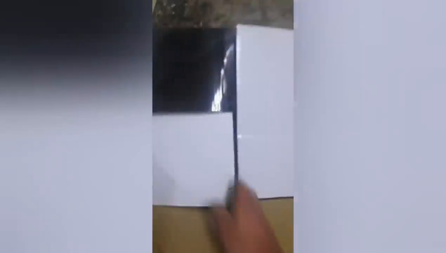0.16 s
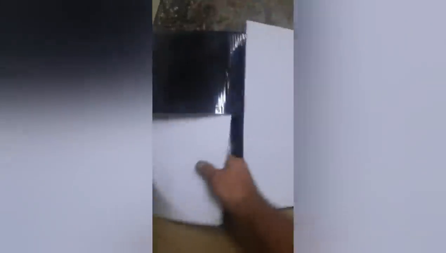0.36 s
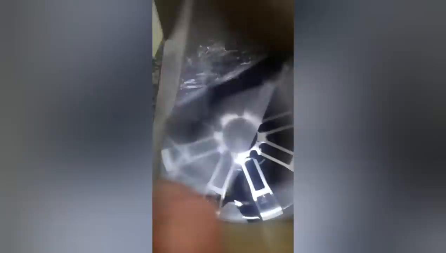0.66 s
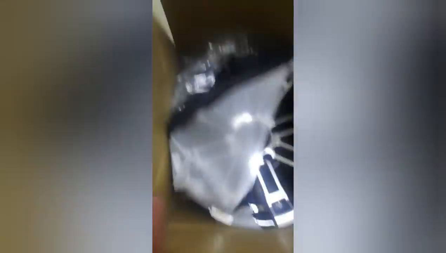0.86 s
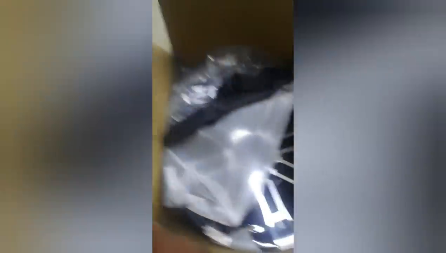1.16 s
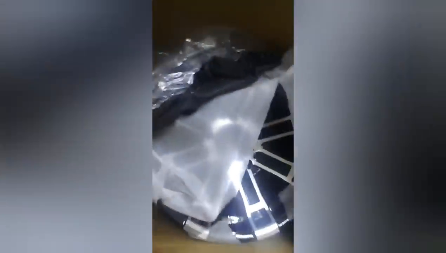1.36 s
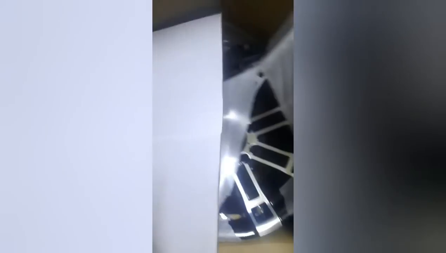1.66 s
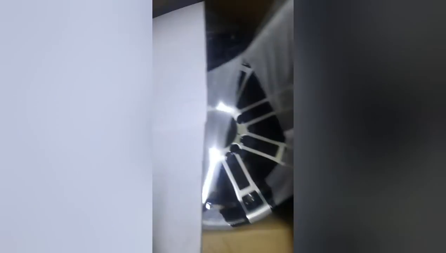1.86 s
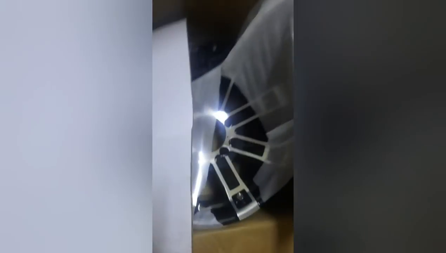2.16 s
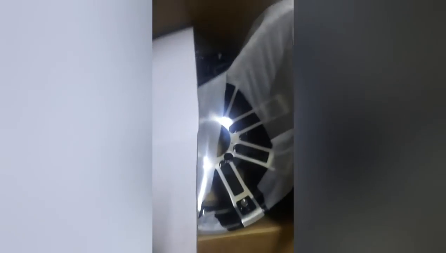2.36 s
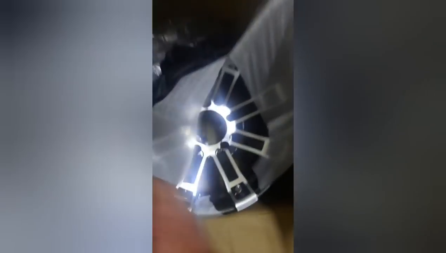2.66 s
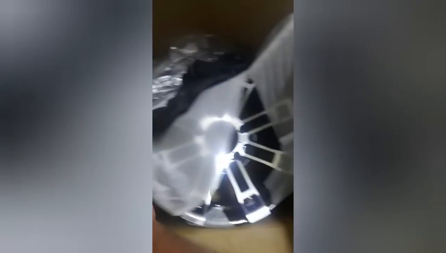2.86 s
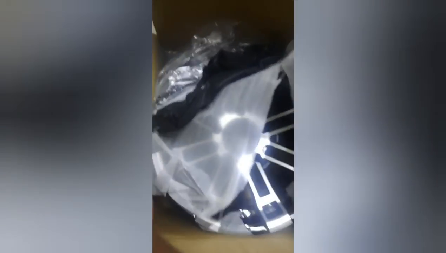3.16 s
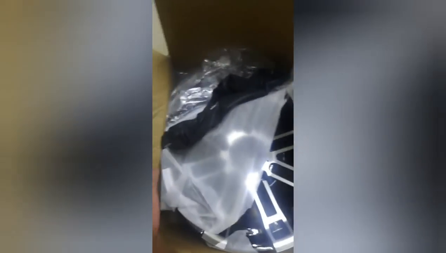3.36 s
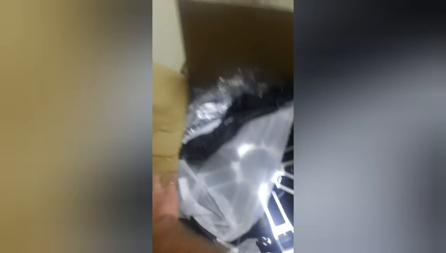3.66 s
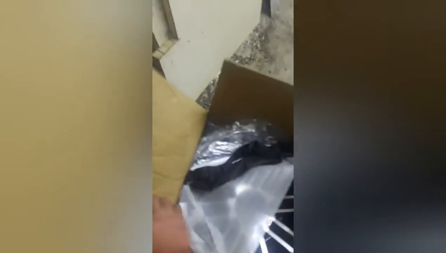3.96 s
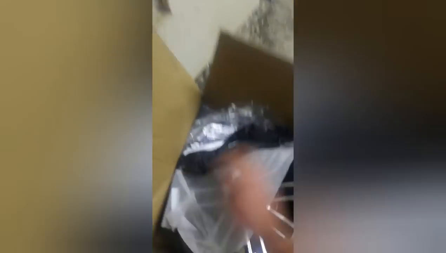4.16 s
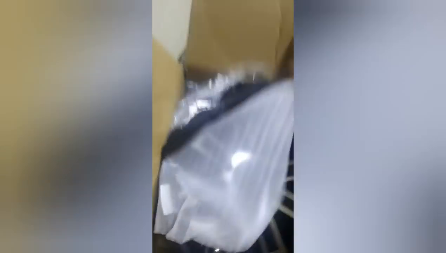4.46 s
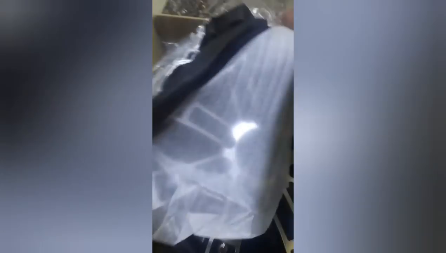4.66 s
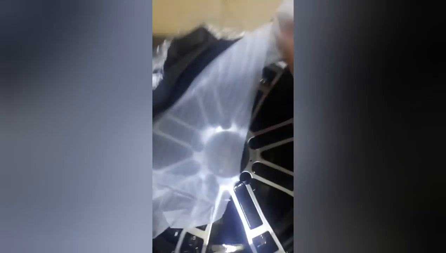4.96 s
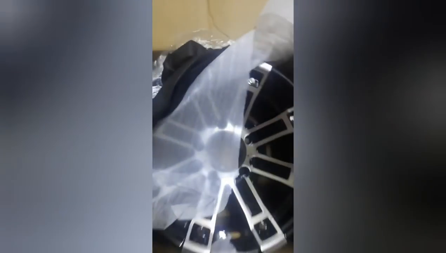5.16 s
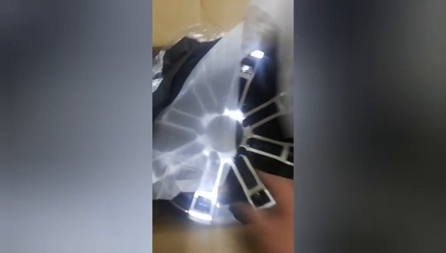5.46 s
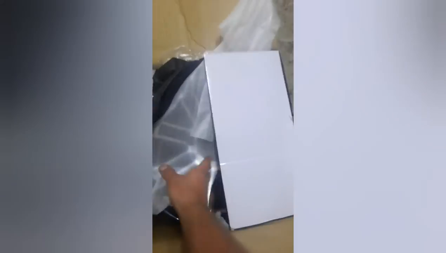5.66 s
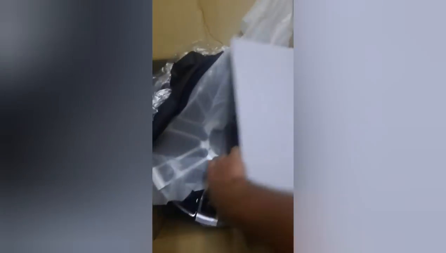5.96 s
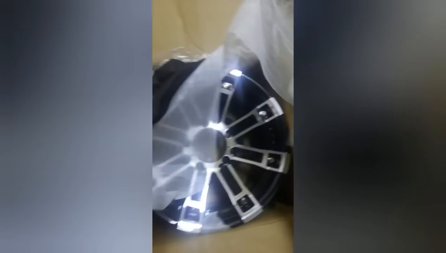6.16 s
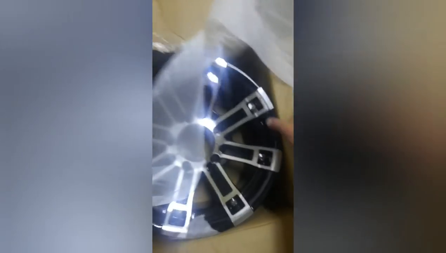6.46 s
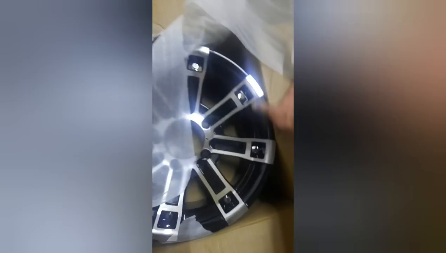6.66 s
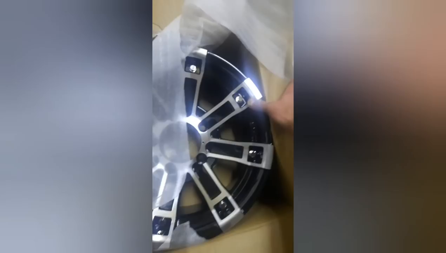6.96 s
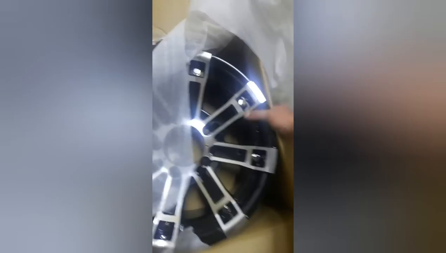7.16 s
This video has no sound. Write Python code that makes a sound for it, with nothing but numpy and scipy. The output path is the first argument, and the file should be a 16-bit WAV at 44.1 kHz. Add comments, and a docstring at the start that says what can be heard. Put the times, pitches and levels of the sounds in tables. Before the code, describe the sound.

Stiff card rubs over crinkly wrap and the walls of a hollow box, in uneven hand strokes. Flaps knock dully, creases crack, and broad panels thud softly. It is busiest in the first two seconds, quiet in the middle, busy again with a softer, lower hiss of foam, then sparse. Heard close by a phone with dull treble, in a lightly echoing garage.

```python
"""Hands open a cardboard box in a garage and pull card sheets and plastic wrap off the wheel inside.
From the start card hisses over wrap, scrapes the box and bends its walls: slips through resonances.
Flaps knock, panels flop and creases snap as decaying tones and noise bursts; a stiff edge ticks at 3.3 s.
From 4.6 s the slide runs on foam, with a lower hiss, and grows sparser after 5.8 s.
Short room echoes follow the handling; a faint steady noise lies under it all, heard by a phone."""
import sys
import numpy as np
from scipy import signal
from scipy.fft import rfft, irfft
from scipy.io import wavfile
from scipy.ndimage import uniform_filter1d

SR = 44100
rng = np.random.default_rng(int(sys.argv[2]) if len(sys.argv) > 2 else 0)


def unload_wav(signal):
    """Save mono or channel-first audio to the path in sys.argv[1] as 16-bit WAV at rate SR, clipped to [-1, 1]."""
    wavfile.write(
        sys.argv[1],
        SR,
        np.round(np.clip(np.atleast_2d(signal).T, -1, 1) * 32767).astype(np.int16),
    )


N = 321533
T = np.arange(N) / SR

CATCH_S, SWELL_DB, FADE_DB = 0.0025, 13, 25


def stroke_shape(swell_s, hold_s, fade_s):
    """Gain of one movement: it catches, swells by SWELL_DB, holds, then loses FADE_DB per fade time."""
    t = T[:SR]
    swelling = np.maximum(1 - t / max(swell_s, .001), 0)
    fading = np.maximum(t - swell_s - hold_s, 0) / max(fade_s, .01)
    catch = 1 - np.exp(-t / CATCH_S)
    return catch * undb(-SWELL_DB * swelling - FADE_DB * fading)


# Hand pushes or pulls card over wrap and box. Each row: start in seconds, swell in seconds,
# hold in seconds, fade in seconds, wrap hiss in dB, card scrape in dB, edge over scrape in dB,
# wall bending in dB. Levels are relative within a layer.
HAND_STROKES = [(0.0, 0.001, 0.18, .45, -37.5, -41.5, 5.5, -45.5),
                (0.203, 0.074, 0.022, 0.12, -34.5, -47, 1, -34),
                (0.36, 0.034, 0.04, .15, -40, -52.5, 6, -49), (0.478, 0.11, 0.0061, .05, -37, -45, 7, -52),
                (0.589, .005, 0.012, 0.07, -26, -31, 10, -23),
                (0.605, 0.012, 0.0075, .17, -32, -30, 2, -18.5),
                (0.782, 0.022, 0.067, .12, -44.5, -54, 4, -33.5),
                (0.92, 0.011, 0.013, 0.31, -48.5, -55.5, 6, -47),
                (1.074, 0.015, 0.031, .28, -35.5, -40.5, -0.5, -35.5),
                (1.161, 0.038, 0.022, .3, -37, -41, 4.5, -51),
                (1.295, .02, 0.11, .2, -44.5, -40.5, -2, -48),
                (1.397, .11, .012, .12, -29.5, -39.5, 2.5, -33.5),
                (1.567, 0.016, 0.0092, .15, -39, -41.5, 1, -29.5),
                (1.622, 0.034, 0.013, .15, -35, -41.5, 9, -37),
                (1.728, .006, 0.027, 0.16, -36.5, -43.5, 9.5, -32),
                (1.844, 0.016, 0.012, .18, -51, -51, -9, -30.5),
                (1.958, 0.038, 0.017, 0.29, -43.5, -58, 6.5, -52),
                (2.054, 0.15, 0.25, 0.13, -41, -67, 14.5, -59),
                (2.267, 0.059, 0.21, 0.035, -51, -52.5, -3, -60),
                (2.638, 0.044, 0.053, 0.075, -49, -52.5, -6, -59),
                (2.738, 0.012, 0.006, .07, -54, -46.5, -7, -53),
                (2.881, 0.022, 0.013, 0.12, -58.5, -46, -30, -51),
                (2.971, 0.018, 0.012, .1, -53.5, -60, 1.5, -55),
                (3.069, 0.029, 0.042, 0.17, -46, -45.5, -3.5, -57),
                (3.26, 0.011, 0.048, .15, -44, -53.5, 6, -44.5),
                (3.36, 0.056, 0.066, .25, -43, -53, 5, -63),
                (3.556, 0.041, .005, .08, -44.5, -45.5, -4, -57),
                (3.617, 0.0072, 0.012, 0.44, -48, -42, -5, -36),
                (3.75, 0.0058, 0.039, .1, -46.5, -52, 0, -51),
                (3.797, 0.0079, 0.078, .18, -36.5, -45.5, 3.5, -41.5),
                (3.985, 0.034, 0.033, .1, -47.5, -50, 6.5, -52),
                (4.058, 0.0039, 0.017, .1, -39, -39, -1, -50),
                (4.107, 0.0063, 0.036, .2, -36, -43, 8.5, -44),
                (4.287, 0.15, 0.076, 0.12, -31, -30, 1.5, -35),
                (4.731, 0.029, 0.067, 0.1, -41.5, -31.5, -0.5, -58),
                (4.815, 0.042, 0.014, .15, -31, -26.5, 0, -28.5),
                (5.197, 0.024, 0.18, .15, -38.5, -48, 6.5, -58),
                (5.299, 0.089, 0.034, 0.19, -28.5, -39.5, 9.5, -34),
                (5.552, 0.018, 0.13, .1, -45.5, -59, 14.5, -48),
                (5.756, 0.097, 0.047, .2, -42.5, -53, 10.5, -63),
                (5.892, 0.11, 0.28, .24, -39.5, -56, 2, -61),
                (6.23, 0.011, 0.038, 0.17, -60, -50.5, -9, -45),
                (6.576, 0.086, 0.015, .1, -55, -74, 2, -86),
                (6.736, 0.086, 0.072, 0.11, -47, -55.5, 12, -52.5),
                (7.06, 0.016, 0.049, .1, -50, -56.5, 5.5, -48.5),
                (7.096, 0.057, 0.037, 0.13, -42, -49, 5.5, -42.5)]
HUM_FROM_SCRAPE_DB, HUM_FROM_WALLS_DB = -2.5, -5


def stroke_gains():
    """Gain of each rubbing layer: strokes add in power; scraping and bending together drive the hollow."""
    power = np.zeros((4, N))
    for start_s, swell_s, hold_s, fade_s, hiss_db, scrape_db, edge_db, bend_db in HAND_STROKES:
        shape = stroke_shape(swell_s, hold_s, fade_s)
        levels_db = (hiss_db, scrape_db, scrape_db + edge_db, bend_db)
        for layer, db in zip(power, levels_db):
            add(layer, start_s, (undb(db) * shape) ** 2)
    hiss, scrape, edge, flex = np.sqrt(power)
    hum = np.hypot(undb(HUM_FROM_SCRAPE_DB) * scrape, undb(HUM_FROM_WALLS_DB) * flex)
    return hiss, scrape, edge, hum, flex


# Spectra of plastic wrap, foam cover, card, crumpling or creasing, and bending box walls.
# Each row: frequency in Hz, level in dB.
WRAP_SPECTRUM = [(2120, -21), (3600, -11.5), (5370, -1.5), (7300, 0), (7980, -2.5), (9450, -17),
                 (12300, -47.5), (20800, -120)]
FOAM_SPECTRUM = [(1710, -22), (2900, -10), (3230, -8), (4520, -3), (4950, -1.5), (5350, -0.5), (7270, 1.5),
                 (8230, -4), (9450, -14.5), (12300, -65), (20800, -120)]
CARD_SPECTRUM = [(240, -14.5), (400, -3), (443, -5.5), (657, -4), (712, -2), (773, -4), (846, 1),
                 (975, -11), (1080, -7), (1220, -9.5), (1720, -7), (2260, -6), (2500, -9.5), (3160, -16),
                 (4500, -17), (5850, -34), (9900, -120)]
CREASE_SPECTRUM = [(880, -31.5), (1500, 3), (2550, 4), (3120, -5.5), (3340, -4.5), (5680, -3),
                   (6630, -11.5), (7560, 2.5), (9450, -23.5), (12300, -54.5), (20800, -120)]
WALL_SPECTRUM = [(22, -27.5), (45, 0.5), (80, 1.5), (150, 4), (220, -2.5), (330, -16.5), (600, -44)]
# Resonances of the card panels, then air modes of the open box.
# Each row: frequency in Hz, level in dB, t60 in seconds.
PANEL_MODES = [(479, -9, .09), (524, -9, .09), (646, -10, .08), (758, -9, .08), (962, -1, .08),
               (1157, -12, .05), (1437, -8, .06), (1685, -7, .06), (2007, -8, .06)]
HOLLOW_MODES = [(295.4, -7, 0.14), (323.2, 3.5, 0.059), (376, 0.5, 0.06)]
FOAM_FROM_S = 4.6


def rubbing(edge_hz=1250, firm_db=-32, crumple_db=-3, crumple_growth=0.69):
    """Card catches and slips over wrap and box; the same uneven grip shakes every layer."""
    hiss, scrape, edge, hum, flex = stroke_gains()
    grip_db = 1.0 * walk(45) + 0.66 * walk(170)
    t = T[:SR // 5]

    # dense slips hiss, sparse ones crinkle
    film = slips(rate=17000, spread_db=1.5) + undb(-12.5) * slips(rate=290, spread_db=5)
    on_wrap = unit(colour(film, WRAP_SPECTRUM))
    on_foam = unit(colour(film, FOAM_SPECTRUM))
    slide = np.where(T < FOAM_FROM_S, on_wrap, on_foam)
    # coarser, lower crumpling grows with the hiss gain
    crumple = unit(colour(slips(rate=3500, spread_db=1), CREASE_SPECTRUM))
    crumple *= (hiss / undb(firm_db)) ** crumple_growth
    wrap = (slide + undb(crumple_db) * crumple) * hiss * undb(-1 + 1.41 * grip_db)

    # coarse fibres catch and ring the board; a sharp edge brings out its upper range
    fibres = slips(rate=2600, spread_db=1.0)
    ringing = unit(convolve(fibres, ring(PANEL_MODES, t)))
    board = unit(colour(fibres, CARD_SPECTRUM)) + undb(-2) * ringing
    low_pass = signal.butter(4, edge_hz, "low", fs=SR, output="sos")
    high_pass = signal.butter(4, edge_hz, "high", fs=SR, output="sos")
    dull = unit(signal.sosfilt(low_pass, board))
    sharp = unit(signal.sosfilt(high_pass, board))
    card = dull * scrape * undb(-2.8 + 1.17 * grip_db)
    card += sharp * edge * undb(-3.4 + 1.3 * grip_db)

    # the hollow hums and the broad walls rumble
    hollow = unit(convolve(slips(rate=900, spread_db=-1.0), ring(HOLLOW_MODES, t)))
    hollow *= hum * undb(0.7 + grip_db)
    walls = unit(colour(slips(rate=300, spread_db=-2.0), WALL_SPECTRUM))
    walls *= flex * undb(-4.5 + grip_db)
    return wrap + card + hollow + walls


def bending(x, depth_db=2.5, size=1024, count=5):
    """As a sheet bends its resonances come and go: narrow bands swell and sink on their own."""
    spectra = signal.stft(x, nperseg=size)[2]
    chance = rng.standard_normal(spectra.shape)
    across_bands = uniform_filter1d(chance, count, axis=0)
    drift = unit(uniform_filter1d(across_bands, count, axis=1))
    gain = unit(undb(depth_db * drift))
    return signal.istft(spectra * gain, nperseg=size)[1][:N]


def board_ring(t, spot_db=4, detune=0.02):
    """Card struck at a random spot: each panel mode varies in strength and tuning."""
    chance = rng.standard_normal((len(PANEL_MODES), 2))
    modes = []
    for (hz, db, t60), (a, b) in zip(PANEL_MODES, chance):
        modes.append((hz * (1 + detune * a), db + spot_db * b, t60))
    return ring(modes, t)


# A flap knocks on the box. Each row: start in seconds, relative level in dB, pitch of the hollow in Hz,
# hardness in dB, length of the push in seconds.
FLAP_KNOCKS = [(0.251, -32, 290, 0, 0.00072), (0.602, -16, 270, -19, 0.00053),
               (0.623, -22, 290, -0.5, 0.00065), (0.678, -21.5, 247, 5, 0.0068),
               (0.825, -5, 340, -9.5, 0.0012), (1.861, -16, 288, -9.5, 0.0022),
               (2.577, -38.5, 300, -4, 0.00059), (2.68, -49, 328, -7, 0.0063),
               (2.759, -30.5, 307, -11, 0.0075), (2.904, -31, 307, -25, 0.0075),
               (2.965, -38, 320, 0.5, 0.00068), (3.097, -26.5, 327, -6.5, 0.00094),
               (3.613, -6.5, 291, -11, 0.0015), (4.075, -14.5, 304.4, 6, 0.00097),
               (4.385, -19.5, 290, 1, 0.00085), (4.744, -25.5, 317, -15, 0.046),
               (6.233, -27, 323, -3, 0.0011)]


def knocks(hollow_db=-1.0, board_db=-2.0, crunch_db=-5, boom_s=0.0097, damp_s=0.011):
    """Each knock booms in the hollow; a slow push swells softly, a hard one rings the board more."""
    out, t = np.zeros(N), T[:SR // 4]
    crunch_spectrum = [(150, -14.0), (400, -3), (1000, 3), (2200, -12.0), (5000, -26.5)]  # Hz, dB
    for s, db, hz, hard_db, push_s in FLAP_KNOCKS:
        swell = 1 - np.exp(-(t / max(push_s, .0003)) ** 2)
        boom = swell * np.exp(-t / boom_s) * np.sin(2 * np.pi * hz * t)
        # the flutes crunch under the blow; the flap stays in contact and damps the board
        crunch = unit(colour(slips(rate=8100, spread_db=5.0, size=len(t)), crunch_spectrum))
        struck = peak(board_ring(t)) + undb(crunch_db) * crunch
        clack = struck * np.exp(-t / damp_s) * swell
        knock = undb(hollow_db) * peak(boom) + undb(board_db + hard_db) * peak(clack)
        add(out, s, undb(db) * knock)
    return out


# A crease snaps or an edge slips off. Each row: start in seconds, relative level in dB,
# board-to-crack balance in dB, decay constant in seconds.
CREASE_SNAPS = [(0.593, -5, -9, 0.0071), (0.617, -5.5, 9, 0.0068), (0.657, -14.5, 10, 0.0051),
                (1.084, -18, -2.5, 0.0048), (1.507, -13.5, -10, 0.02), (1.662, -20.5, 13, 0.011),
                (1.74, -16.5, -5, 0.013), (1.764, -18, -20, 0.012), (2.34, -24, -16, 0.0039),
                (3.753, -28.5, -5, 0.013), (3.809, -5.5, -9, 0.0047), (3.877, -24, -14, 0.02),
                (4.119, -11, 18, 0.0048), (4.293, -26, 12, 0.0069), (4.321, -26, 2, 0.0058),
                (4.367, -17, 13, 0.0071), (4.448, -6.5, 17, 0.013), (4.471, -8, 11, 0.012),
                (4.505, -7.5, -3, 0.011), (4.76, -15, 14.5, 0.012), (4.86, -15.5, 2, 0.011),
                (4.881, -15.5, 5, 0.0051), (5.398, -8, -5, 0.0068), (5.414, -7.5, -21, 0.0088),
                (5.455, -10.5, -7.5, 0.0056), (5.517, -19, -12, 0.0053), (5.576, -38, 17, 0.0056),
                (5.762, -26.5, -10, 0.0073), (7.227, -27, -14, 0.0079)]


def snaps(crease_db=-9, board_db=-7.0, rise_s=0.00022):
    """A crease gives way as a short avalanche of fibre breaks, part of it coloured by the board."""
    out, t = np.zeros(N), T[:SR // 6]
    for s, db, body_db, decay_s in CREASE_SNAPS:
        breaks = slips(rate=8000, spread_db=4.0, size=len(t))
        avalanche = peak((1 - np.exp(-t / rise_s)) * np.exp(-t / max(decay_s, .001)))
        crack = undb(crease_db) * unit(colour(breaks, CREASE_SPECTRUM))
        body = undb(board_db + body_db) * unit(colour(breaks, CARD_SPECTRUM))
        add(out, s, undb(db) * avalanche * (crack + body) / np.hypot(1, undb(body_db)))
    return out


# A wall or sheet is bumped and flops. Each row: start in seconds, relative level in dB, pitch in Hz.
PANEL_BUMPS = [(0.268, -24.5, 84), (0.614, -13, 168.4), (0.633, -15, 81.6), (0.655, -19, 200),
               (1.081, -27.5, 98.5), (1.209, -26.5, 90), (1.52, -25, 176), (1.584, -17.5, 134.5),
               (1.655, -33, 80), (1.741, -34, 85), (1.816, -19.5, 166), (1.882, -28, 97.7),
               (2.997, -35, 88.4), (3.122, -35, 65.4), (3.267, -35, 180), (3.615, -21, 85),
               (3.636, -18, 113), (4.077, -29.5, 191), (4.451, -22, 156), (5.208, -19.5, 156.3),
               (5.222, -21.5, 63.7), (5.466, -28, 72), (5.668, -30.5, 100), (6.227, -33, 160),
               (6.318, -35.5, 93.8), (7.07, -30, 109), (7.115, -34, 104)]


def bumps(level_db=-2, decay_s=0.01, push_s=0.0074, overtone=1.68, overtone_db=-6):
    """A broad panel swings for a few cycles after a soft push."""
    out, t = np.zeros(N), T[:SR // 4]
    for s, db, hz in PANEL_BUMPS:
        swing = np.sin(2 * np.pi * hz * t)
        swing += undb(overtone_db) * np.sin(2 * np.pi * hz * overtone * t)
        envelope = (1 - np.exp(-t / push_s)) * np.exp(-t / decay_s)
        add(out, s, undb(db + level_db) * peak(swing * envelope))
    return out


# A fingernail ticks on stiff plastic. Each row: start in seconds, relative level in dB, pitch in Hz.
NAIL_TICKS = [(3.264, -26, 2210)]


def ticks(level_db=-1, decay_s=0.0013, partner=0.76):
    """A small stiff piece rings briefly with a pair of modes."""
    out, t = np.zeros(N), T[:SR // 20]
    for s, db, hz in NAIL_TICKS:
        pair = np.sin(2 * np.pi * hz * t) - 0.19 * np.sin(2 * np.pi * hz * partner * t)
        add(out, s, undb(db + level_db) * peak(pair * np.exp(-t / decay_s)))
    return out


# First echoes from floor and nearby walls. Each row: delay in seconds, level in dB before colouring.
EARLY_ECHOES = [(.0065, -31.5), (0.023, -18), (0.05, -22), (.053, -27)]


def garage(x, t60=0.44, tail_db=-12, build_s=0.0061):
    """A few early echoes and a short diffuse tail, both weaker in the treble."""
    t = T[:SR]
    decay = np.exp(-np.log(1000) * t / t60)
    tail = rng.standard_normal(SR) * decay * (1 - np.exp(-t / build_s))
    response = undb(tail_db) * tail / np.sqrt(np.sum(tail ** 2))
    for s, db in EARLY_ECHOES:
        response[int(s * SR)] += undb(db)
    return x + colour(convolve(x, response), [(60, 0.5), (300, 1), (1500, -2), (8000, -11.0)])


# Spectrum of the quiet garage. Each row: frequency in Hz, level in dB.
GARAGE_SPECTRUM = [(25, -5.5), (100, -6), (220, -14.5), (315, 5), (420, 1), (1500, -5.5), (3200, -17),
                   (6500, -10.5), (9500, -25)]
AMBIENCE_DB = -62  # rms before the microphone


def ambience():
    """Steady random noise with the spectrum of the quiet garage."""
    return undb(AMBIENCE_DB) * unit(colour(rng.standard_normal(N), GARAGE_SPECTRUM))


def slips(rate, spread_db, size=N):
    """Tiny random catches and releases, rate per second, with random sign and strength."""
    chance, strength = rng.random(size), rng.standard_normal(size)
    sign = rng.choice([-1, 1], size)
    gain = undb(spread_db * np.clip(strength, -3, 2.5))
    return unit((chance < rate / SR) * sign * gain)


def walk(rate):
    """Smooth random wandering of rms 1, rate in steps per second."""
    steps = rng.standard_normal(4096)
    return unit(np.interp(T * rate, np.arange(len(steps)), steps))


def ring(modes, t):
    """Free ringing of a set of (Hz, dB, t60) modes."""
    return sum(undb(db - 60 * t / t60) * np.sin(2 * np.pi * hz * t) for hz, db, t60 in modes)


def colour(x, points, size=4096):
    """Causal minimum-phase filter with the given (Hz, dB) spectrum."""
    hz, db = np.transpose(points)
    grid = np.maximum(np.arange(size // 2 + 1) * SR / size, 1)
    gain = undb(np.interp(np.log(grid), np.log(hz), db))
    cepstrum = irfft(np.log(gain))
    # fold the cepstrum onto positive time
    cepstrum[1:size // 2] *= 2
    cepstrum[size // 2 + 1:] = 0
    return convolve(x, irfft(np.exp(rfft(cepstrum))))


def convolve(x, response):
    """Pass x through a response, keeping its length."""
    return signal.fftconvolve(x.ravel(), response)[:x.size].reshape(x.shape)


def undb(db):
    """Decibels to gain."""
    return 10 ** (np.asarray(db) / 20)


def unit(x):
    """Scale to rms 1."""
    return x / np.sqrt(np.mean(x ** 2))


def peak(x):
    """Scale to peak 1."""
    return x / np.abs(x).max()


def add(track, s, sound):
    """Mix a sound in at time s in seconds."""
    i = max(int(s * SR), 0)
    track[i:i + len(sound)] += sound[:max(N - i, 0)]


def scene():
    """All the handling in the room, over a faint background."""
    handling = bending(rubbing()) + knocks() + snaps() + bumps() + ticks()
    return (garage(handling) + ambience())[None]


def record(dry, top_hz=9500):
    """The phone's microphone loses the deepest bass, lifts about 4 kHz and cuts off above top_hz."""
    heard = colour(dry, [(20, -17.0), (45, 1.5), (2400, -1), (3200, 0.5), (4200, 2.5), (7500, 0.5), (9300, -4)])
    return signal.sosfilt(signal.ellip(10, .2, 70, top_hz, fs=SR, output="sos"), heard)


dry = scene()
out = record(dry)
unload_wav(out)
```